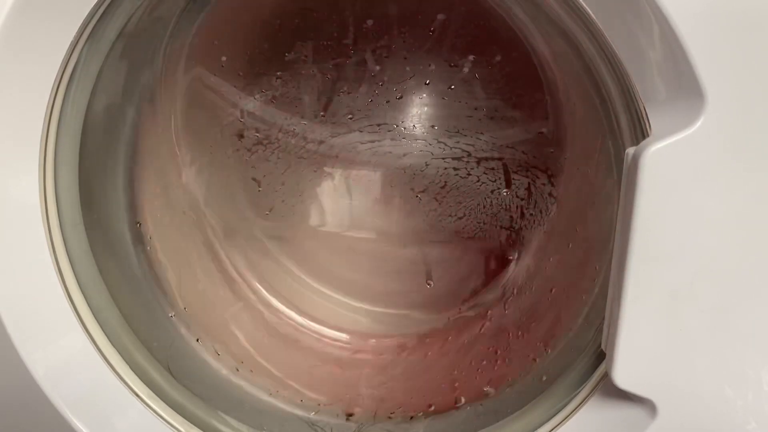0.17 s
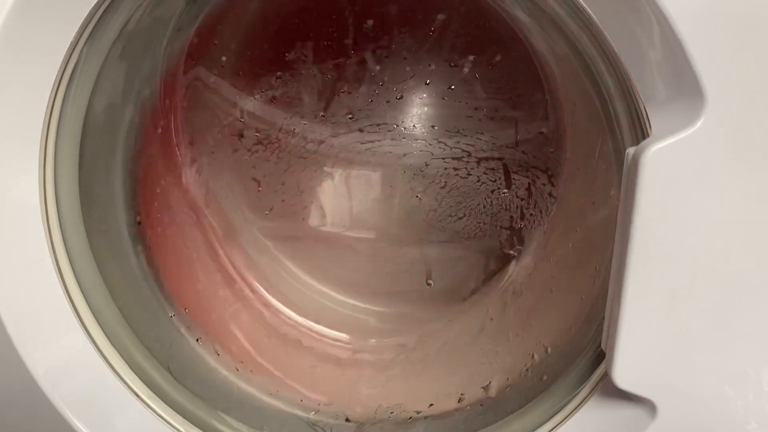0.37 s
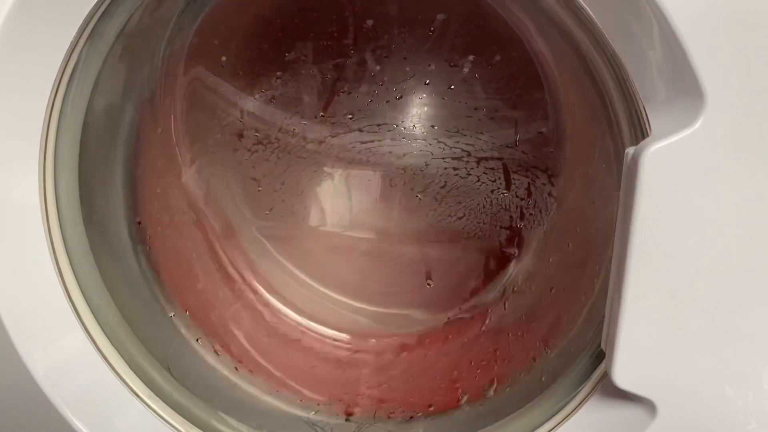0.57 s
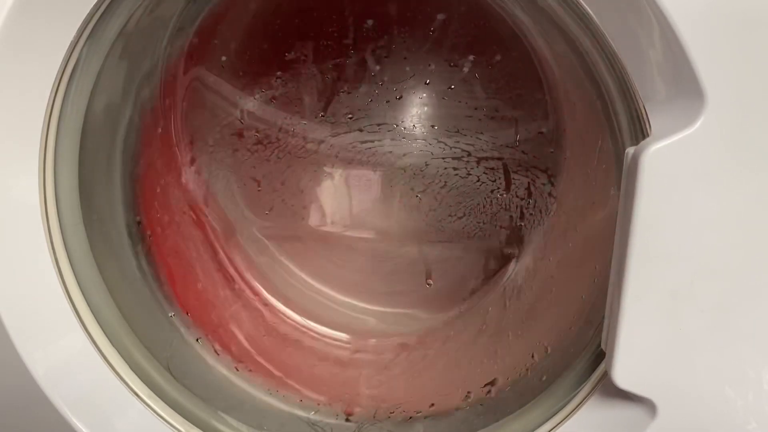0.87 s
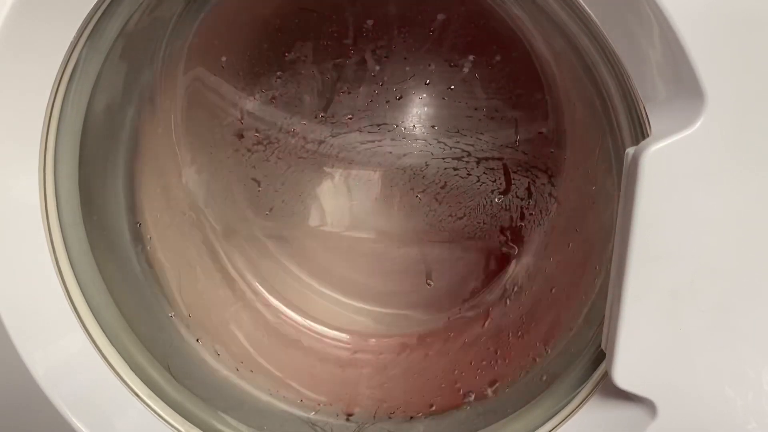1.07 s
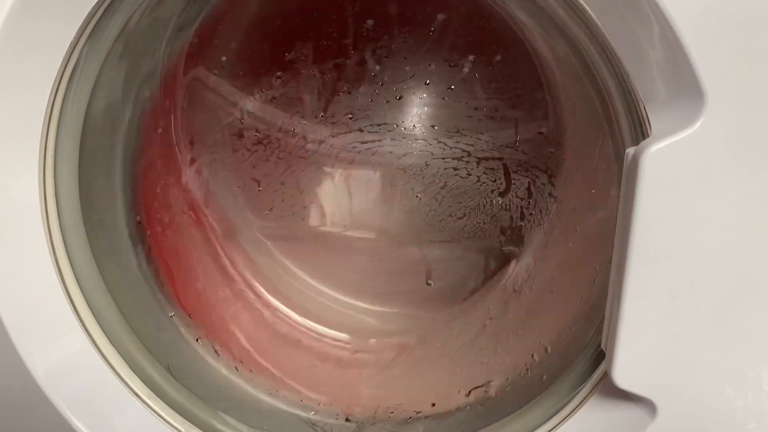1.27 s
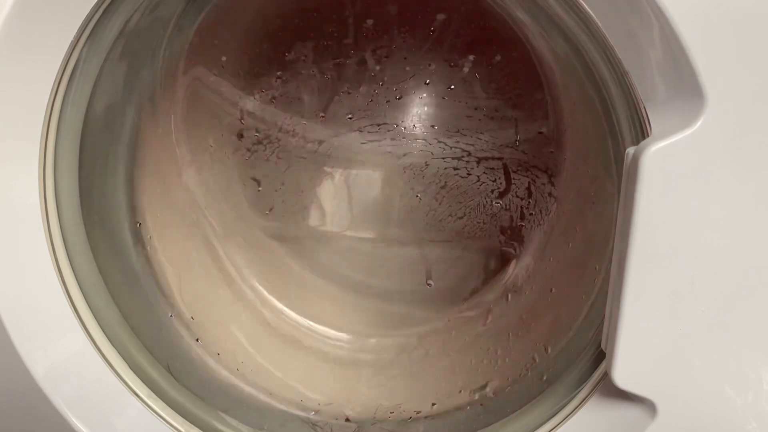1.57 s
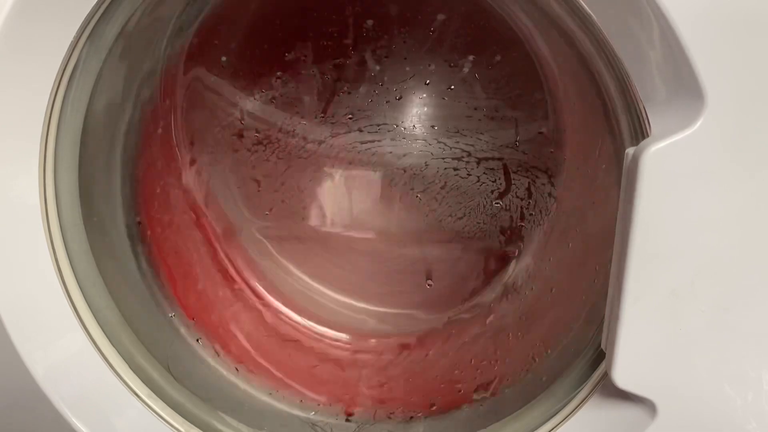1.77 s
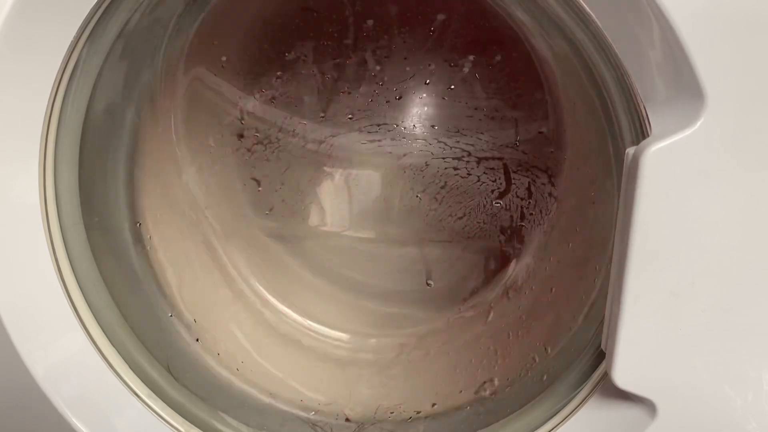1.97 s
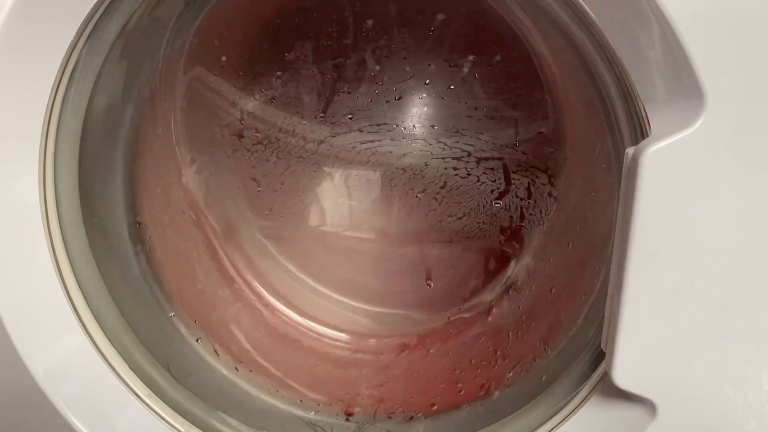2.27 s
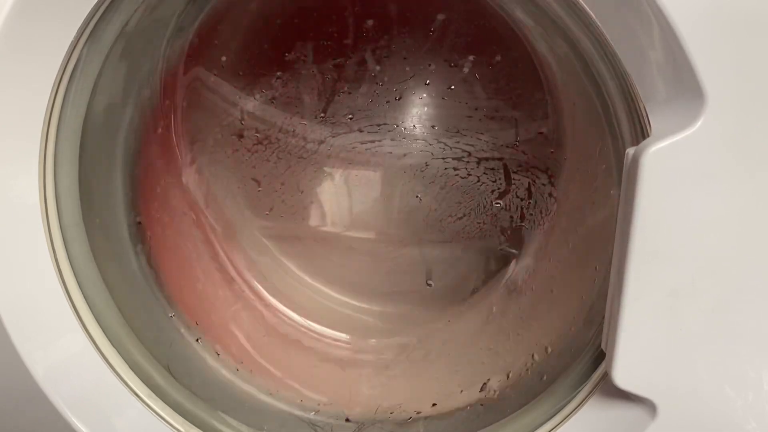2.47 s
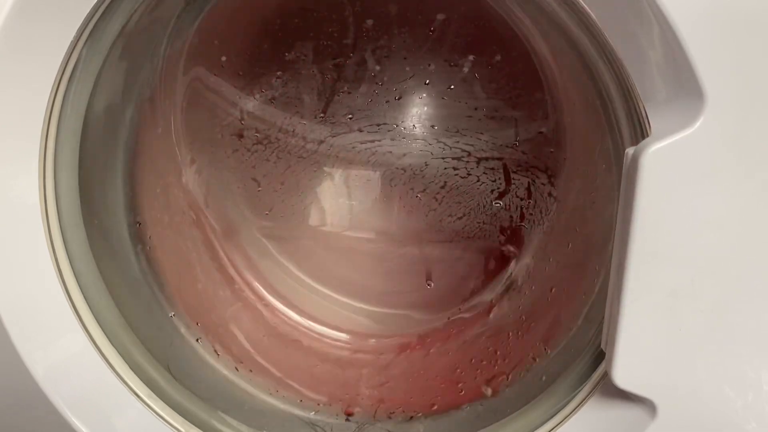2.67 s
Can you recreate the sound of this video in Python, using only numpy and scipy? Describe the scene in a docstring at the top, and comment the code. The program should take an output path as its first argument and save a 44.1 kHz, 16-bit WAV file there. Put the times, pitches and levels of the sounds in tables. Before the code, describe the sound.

Close stereo sound of a front-loader spinning fast indoors, already running and never stopping: fluttering low rumble, rattling cabinet, humming motor, airy hiss, and thin high whines that waver and grow stronger towards the end.

```python
"""A front-loading washing machine at full spin, still gaining a little speed, heard close to its door.
The unbalanced drum shakes the cabinet: harmonics of its rate add to a thump once a turn.
Bearing tones follow the shaft between those harmonics; the belt-driven motor, some twelve times faster,
hums and whines in harmonics of its own. Filtered noise makes the air roar around the drum and the hiss.
Two microphone ports hear all this with slightly different level and phase."""
import sys
import numpy as np
from scipy.fft import rfft, irfft, next_fast_len
from scipy.io import wavfile
from scipy.ndimage import map_coordinates

SR = 44100
rng = np.random.default_rng(int(sys.argv[2]) if len(sys.argv) > 2 else 0)


def wrap_up_sound(samples):
    """Save the sound to the file named by the first command line argument, as 16-bit audio."""
    columns = np.atleast_2d(samples).T
    # keep every value between -1 and 1, then stretch to whole-number steps
    tamed = np.clip(columns, -1, 1)
    steps = np.round(tamed * 32767).astype(np.int16)
    wavfile.write(sys.argv[1], SR, steps)


N = 123921
TIME = np.arange(N) / SR  # s


def amp(db):
    """Level to amplitude ratio: 20 dB is a factor of ten."""
    return 10 ** (np.asarray(db) / 20)


def along(points, hz):
    """Spectral interpolation of (f/Hz, value) points on a logarithmic frequency axis."""
    f, value = np.transpose(points)
    return np.interp(np.log(hz + 1), np.log(f + 1), value)


def curves(rows):
    """Linear interpolation in time: one value per sample for each column after t/s."""
    t, *columns = np.transpose(rows)
    return [np.interp(TIME, t, column) for column in columns]


def wobble(rate):
    """Band-limited random modulation: a smooth curve through random knots, rate knots a second."""
    knots = TIME * rate
    coarse = np.arange(0, knots[-1] + 1, 1 / 8)
    smooth = map_coordinates(rng.standard_normal(2000), [coarse], mode="mirror")
    return np.interp(knots, coarse, smooth)


def random_phase():
    """Incoherence: a starting phase drawn from the whole cycle, in radians."""
    return rng.uniform(0, 2 * np.pi)


def filtered(x, response):
    """Linear filtering: the spectrum times a complex response of frequency."""
    m = next_fast_len(N + SR // 2)  # padding lets the filter ring out
    return irfft(rfft(x, m) * response(np.fft.rfftfreq(m, 1 / SR)), m)[..., :N]


def spread(phase, mid_db, side_db):
    """Mid-side stereo: a tone whose side part runs a quarter cycle off its middle; levels are rms."""
    mid = amp(mid_db) * np.cos(phase)
    side = amp(side_db) * np.sin(phase)
    return np.sqrt(2) * np.array([mid + side, mid - side])


def rough_tone(phase, rough, rate):
    """Random modulation gives a tone, of rms near 1, narrow noise sidebands."""
    phase = phase + random_phase()
    in_phase = (1 + rough * wobble(rate)) * np.cos(phase)
    quadrature = rough * wobble(rate) * np.sin(phase)
    return (in_phase + quadrature) / np.sqrt(.5 + rough ** 2)


BELT_HZ = 16.6


def belt():
    """Periodic forcing: the belt's join comes round more slowly than the drum."""
    return np.sin(2 * np.pi * BELT_HZ * TIME)


# Motor shaft speed: t/s, rate/Hz (turns per second)
SHAFT_SPEED = [(0, 263.97), (0.6, 266.01), (1.2, 267.56), (1.7, 268.52), (2.2, 269.17), (2.8, 269.45)]
BELT_RATIO = 11.98  # motor turns per drum turn
THUMP_S = .4985  # a moment when the heavy side of the load strikes


def shaft():
    """Phase is integrated rate: motor and drum angles in radians, the drum's zero at a thump."""
    rate, = curves(SHAFT_SPEED)
    rotor = 2 * np.pi * np.cumsum(rate) / SR
    drum = (rotor - np.interp(THUMP_S, TIME, rotor)) / BELT_RATIO
    return rotor, drum


SHAKE_TRIM_DB = -0.5
SHAKE_WAVER = .012  # unsteadiness added by each higher multiple
THUMP_MULTIPLES = 7  # highest multiple locked to the thump
ODD_LAG_RAD = .75  # odd multiples trail the even ones, which softens the thump
# Cabinet shake, before the trim: multiple of drum rate, mid level/dB, side level/dB, drift/(dB per s)
# Levels hold halfway through.
CABINET_HARMONICS = [(1, -57, -71, 3), (2, -40.5, -64, 0.5), (3, -24.5, -45, 0.5), (4, -29.5, -66, -0.5),
                     (5, -28.5, -54, 3), (6, -32.5, -48, 0), (7, -33, -43, 0), (8, -44, -53, 1),
                     (9, -37, -41.5, -1), (10, -46.5, -53, 3.5), (11, -37, -44, 1.5), (13, -40, -50, 1),
                     (15, -34, -39, 2), (16, -46, -57, 0), (17, -48, -60, 4), (18, -47, -61, 0),
                     (19, -44.5, -50, 0.5), (20, -56, -60, -9.5), (21, -44.5, -55, 0.5), (22, -64, -54, 8),
                     (23, -55.5, -56, 2.5), (25, -46.5, -58, -1), (26, -54, -59, -1), (27, -44.5, -51, 0.5),
                     (28, -46, -61, 3.5), (29, -51, -67, -7), (30, -49, -62, 4.5), (31, -43.5, -58, -2),
                     (32, -68, -58, -3), (33, -53.5, -57, -3.5), (34, -68, -57, -3), (35, -47, -55, 0),
                     (37, -56, -57, 0.5), (38, -51, -52, -5.5), (39, -58, -60, -5), (40, -52, -59, -3),
                     (41, -55, -51, -1.5), (42, -62, -61, 10), (43, -60.5, -50, 2)]


def cabinet(drum):
    """Fourier synthesis: low harmonics line up in one thump a turn; higher ones smear into a rattle."""
    from_middle = (np.arange(N) - N / 2) / SR
    out = np.zeros((2, N))
    for multiple, mid_db, side_db, drift_db in CABINET_HARMONICS:
        lag = ODD_LAG_RAD * (multiple % 2) if multiple <= THUMP_MULTIPLES else random_phase()
        phase = multiple * (drum + SHAKE_WAVER * wobble(5.94)) - lag
        waver = 1 + multiple * SHAKE_WAVER * wobble(8.09)
        gain = amp(SHAKE_TRIM_DB + drift_db * from_middle) * waver
        out -= gain * spread(phase, mid_db, side_db)
    return out


BEARING_TRIM_DB = -0.5
BEARING_ROUGH = 0.37  # depth of the waver in amplitude, and in phase/rad
# Bearing tones, before the trim: f as a multiple of drum rate, mid level/dB, side level/dB
BEARING_TONES = [(5.47, -41.5, -61), (13.38, -43, -62), (15.63, -54.5, -57), (16.57, -54, -54),
                 (24.34, -51.5, -59), (27.7, -49, -67), (28.29, -51.5, -66), (35, -53, -65),
                 (35.4, -47, -44), (36.57, -58, -51), (37.17, -46, -50), (43.2, -52, -51)]


def bearings(drum):
    """Mostly inharmonic partials: wavering tones follow the shaft, nearly all between its multiples."""
    out = np.zeros((2, N))
    for ratio, mid_db, side_db in BEARING_TONES:
        waver = 1 + BEARING_ROUGH * wobble(6.87)
        phase = ratio * drum + random_phase() + BEARING_ROUGH * wobble(7.09)
        out += waver * spread(phase, mid_db, side_db)
    return amp(BEARING_TRIM_DB) * out


MAINS_HZ, MAINS_DB = 100, -37.5  # mains hum, rms level
HUM_TRIM_DB = 0
# Motor hum, before swell and trim: multiple of motor rate, mid level/dB, side level/dB
HUM_HARMONICS = [(1, -26, -43), (2, -42, -49), (3, -52, -46), (4, -54.5, -54), (5, -59, -54), (7, -79, -52)]
# Motor levels: t/s, hum level/dB (only its departure from the mean is used),
# then level/dB of motor multiples 16, 18 and 36 before trim and modulation
MOTOR_LEVELS = [(0, -23, -43, -39.5, -37), (0.2, -22.5, -43, -36, -39), (0.45, -24.5, -44, -39, -39),
                (0.65, -24, -42.5, -44, -37.5), (0.9, -26.5, -56, -40, -38.5),
                (1.15, -27.5, -51, -36.5, -35), (1.35, -27.5, -56, -42.5, -36), (1.6, -28.5, -60, -42, -33),
                (1.85, -26, -58, -38, -32.5), (2.15, -25, -60, -35.5, -31), (2.45, -25.5, -59, -33.5, -30),
                (2.8, -26.5, -58, -33, -30)]


def mains():
    """Sinusoidal forcing by the electric supply."""
    return np.sin(2 * np.pi * MAINS_HZ * TIME)


def hum(rotor):
    """Rotating unbalance: the rotor's fundamental and first overtones, over the mains hum."""
    level_db = curves(MOTOR_LEVELS)[0]
    out = np.sqrt(2) * amp(MAINS_DB) * mains()
    for multiple, mid_db, side_db in HUM_HARMONICS:
        swell_db = .5 * wobble(8.96)
        if multiple == 1:
            swell_db = swell_db + level_db - level_db.mean()
        phase = multiple * rotor + random_phase()
        out = out + amp(HUM_TRIM_DB + swell_db) * spread(phase, mid_db, side_db)
    return out


WHINE_TRIM_DB, WHIR_TRIM_DB = -1, -1
WHINE_ROUGH, WHIR_ROUGH = 0.15, 0.42  # noise skirts of the strong and the faint motor lines
SURGE_RAD, FLUTTER_RAD, JITTER_RAD = 0.022, 0.012, .003  # rotor sways with load, with belt, by chance
LOAD_SWELL, BELT_SWELL, RIPPLE = .25, .08, .1  # amplitude modulation depths
SWELL_TURN = 0.13  # where in the drum's turn the load swell peaks
DIP_DB, DIP_TURN, TOP_WAVER_DB = 6.5, 0.42, 0.74  # the top line dips once a drum turn and wavers
# Strong lines: multiple of motor rate
STRONG_MULTIPLES = [16, 18, 36]
# Faint whir, before trim and ripple: multiple of motor rate, level/dB
FAINT_LINES = [(6, -69), (8, -55), (9, -58.5), (10, -57), (11, -58), (13, -54.5), (14, -52.5), (15, -66),
               (17, -65), (19, -55), (20, -55), (21, -69), (22, -64), (23, -56.5), (25, -59), (26, -63),
               (27, -67), (28, -61), (29, -57), (30, -55), (31, -53), (32, -72.5), (33, -57), (34, -66),
               (35, -52), (37, -64), (38, -52.5), (39, -54.5), (40, -62), (41, -60), (44, -61), (46, -64),
               (50, -63), (52, -61), (54, -57), (56, -64), (57, -65)]


def whine(rotor, drum):
    """Amplitude and phase modulation of slot and commutator tones by load, belt and mains."""
    flutter = belt()
    angle = rotor + SURGE_RAD * np.sin(drum) + FLUTTER_RAD * flutter + JITTER_RAD * wobble(40.5)
    _, low_db, main_db, top_db = curves(MOTOR_LEVELS)
    swell = 1 + LOAD_SWELL * np.cos(drum - 2 * np.pi * SWELL_TURN) + BELT_SWELL * flutter
    dip = ((1 + np.cos(drum - 2 * np.pi * DIP_TURN)) / 2) ** 3  # the cube narrows the dip
    top_db = top_db - DIP_DB * (dip - dip.mean()) + TOP_WAVER_DB * wobble(14)
    gains = amp(low_db) * swell, amp(main_db) * swell, amp(top_db)
    strong = np.zeros(N)
    for multiple, gain in zip(STRONG_MULTIPLES, gains):
        strong += gain * rough_tone(multiple * angle, rough=WHINE_ROUGH, rate=200)
    faint = np.zeros(N)
    for multiple, level_db in FAINT_LINES:
        faint += amp(level_db) * rough_tone(multiple * angle, rough=WHIR_ROUGH, rate=20)
    ripple = 1 + RIPPLE * mains()
    return (amp(WHINE_TRIM_DB) * strong + amp(WHIR_TRIM_DB) * faint) * ripple


ROAR_TRIM_DB, HISS_TRIM_DB = -2.5, -0.33
ROAR_SWING_DB, ROAR_BELT_DB = 2.5, 1.7  # swell of the roar with drum and with belt
HISS_WAVER_DB = 0.28
# Noise spectrum, before trims and swells: f/Hz, level/(dB per Hz)
AIR_SPECTRUM = [(20, -66), (40, -54), (62, -55), (80, -65), (97, -43.5), (120, -54.5), (170, -58.5),
                (230, -64), (305, -59.5), (370, -56.5), (480, -63.5), (700, -58.5), (850, -61.5),
                (1150, -70), (1500, -72), (2000, -71), (2600, -76), (3300, -75.5), (4100, -72), (4800, -70),
                (5500, -78.5), (6400, -82), (7500, -77), (8700, -86.5), (9600, -72.5), (10800, -82),
                (12500, -85.5), (14300, -81.5), (15600, -86.5)]
# Left-right likeness: f/Hz, correlation
AIR_LIKENESS = [(60, .97), (150, .85), (400, .6), (700, .2), (1300, 0), (2400, .3), (4000, .62),
                (5600, .25), (7000, .9), (15000, .9)]


def air(drum, split_hz=1100):
    """Broadband turbulence: a roar swells with drum and belt, under a nearly steady brush and bearing hiss."""
    def mid_side(hz):
        mix_angle = np.arccos(np.clip(along(AIR_LIKENESS, hz), -1, 1)) / 2
        return amp(along(AIR_SPECTRUM, hz)) * [np.cos(mix_angle), np.sin(mix_angle)]

    white = np.sqrt(SR / 2) * rng.standard_normal((2, N))  # unit power per Hz
    mid, side = filtered(white, mid_side)
    noise = np.array([mid + side, mid - side])
    roar = filtered(noise, lambda hz: 1 / (1 + (hz / split_hz) ** 4))
    hiss = noise - roar
    roar_db = ROAR_TRIM_DB - ROAR_SWING_DB * np.cos(drum) + ROAR_BELT_DB * belt()
    hiss_db = HISS_TRIM_DB + HISS_WAVER_DB * wobble(12)
    return roar * amp(roar_db) + hiss * amp(hiss_db)


def scene():
    """Superposition: one shaft drives the layers, which add linearly."""
    rotor, drum = shaft()
    return cabinet(drum) + bearings(drum) + hum(rotor) + whine(rotor, drum) + air(drum)


TOP_HZ = 15850  # band limit
# Port phase: f/Hz, phase/rad by which left leads
PORT_LEAD = [(0, 0), (2400, 0), (3100, 1.1), (4300, .5), (4850, -1), (5300, 0), (6800, 0), (15500, -12.57),
             (22050, -22)]
# Port balance: f/Hz, left minus right level/dB
PORT_BALANCE = [(60, 0), (150, 2), (270, -1), (600, 2.5), (1200, 1.3), (4500, 3.5), (6500, 0.9),
                (15000, -0.5)]


def record(dry):
    """Interchannel level and phase differences: half to each port, and nothing above the band limit."""
    half = np.array([[.5], [-.5]])

    def ports(hz):
        gain = amp(half * along(PORT_BALANCE, hz))
        lead = half * np.interp(hz, *np.transpose(PORT_LEAD))
        return gain * np.exp(1j * lead) * (hz < TOP_HZ)

    return filtered(dry, ports)


dry = scene()
out = record(dry)
wrap_up_sound(out)
```